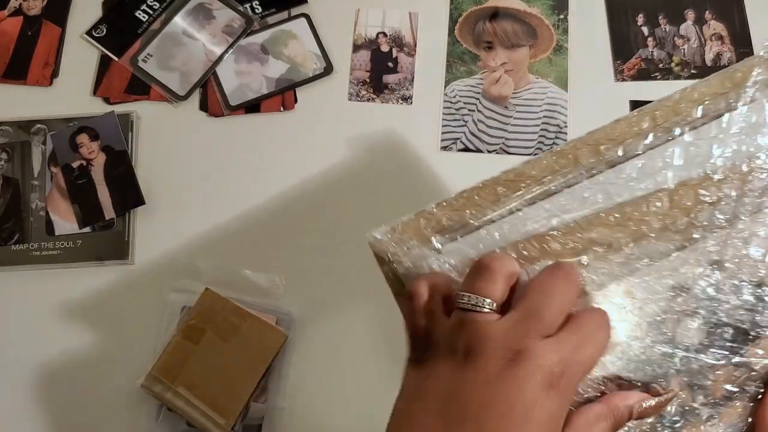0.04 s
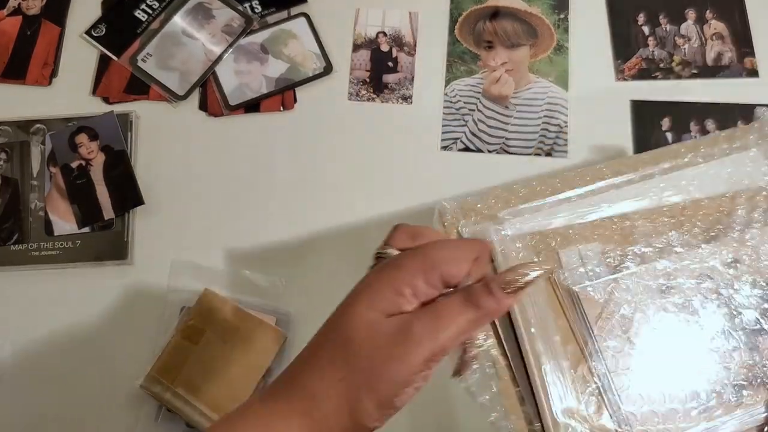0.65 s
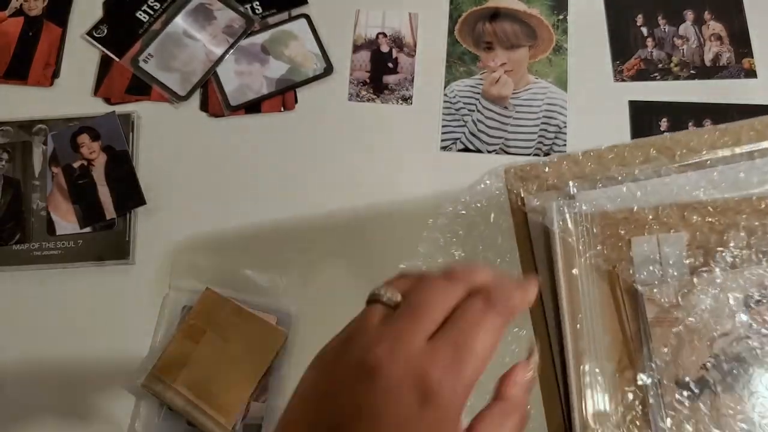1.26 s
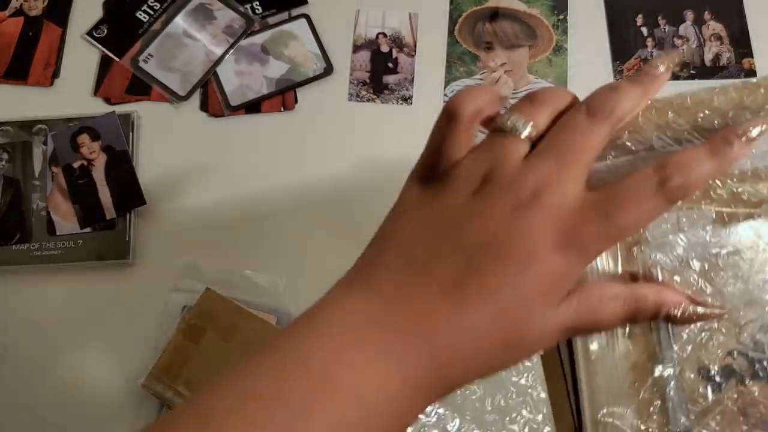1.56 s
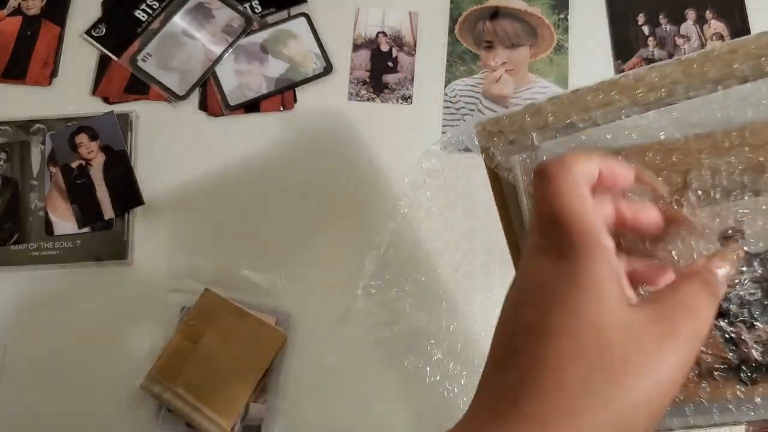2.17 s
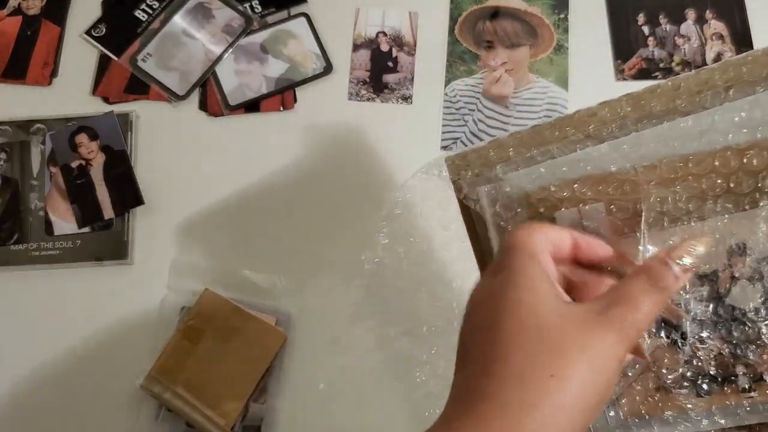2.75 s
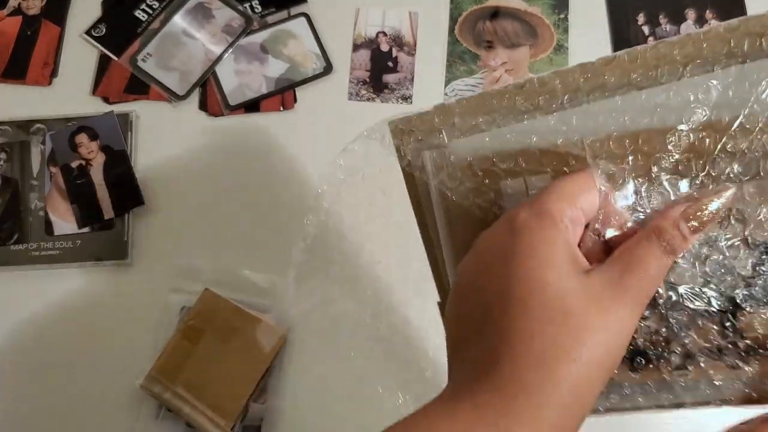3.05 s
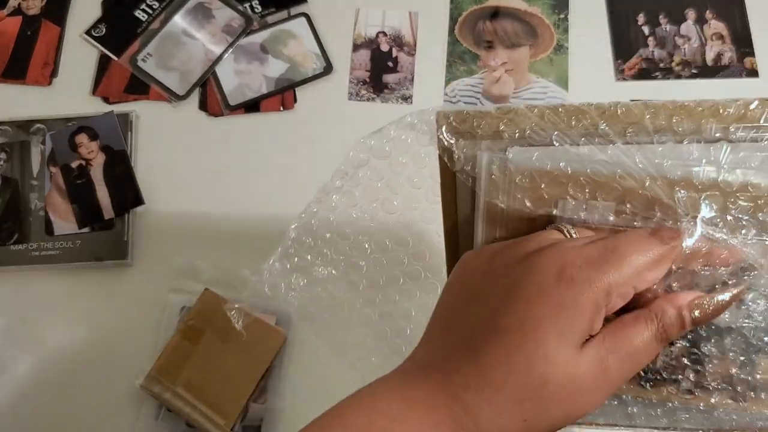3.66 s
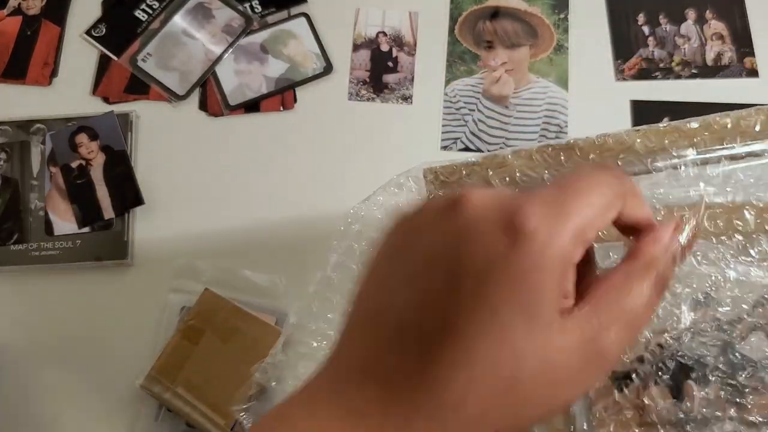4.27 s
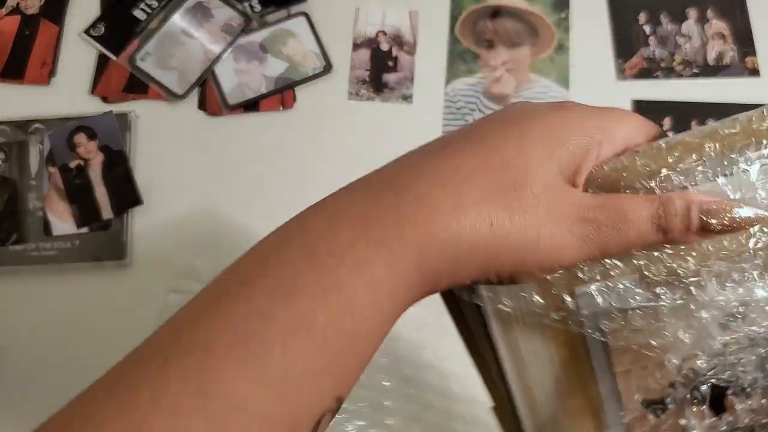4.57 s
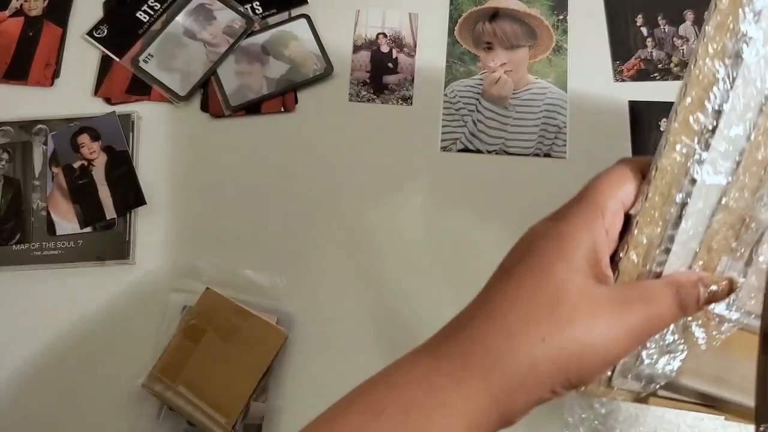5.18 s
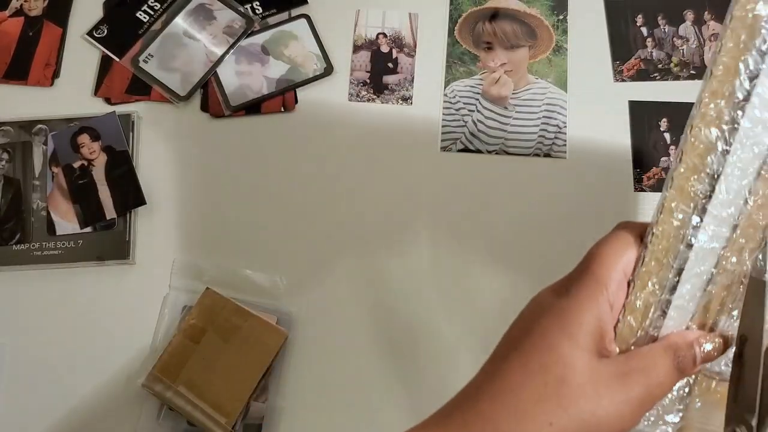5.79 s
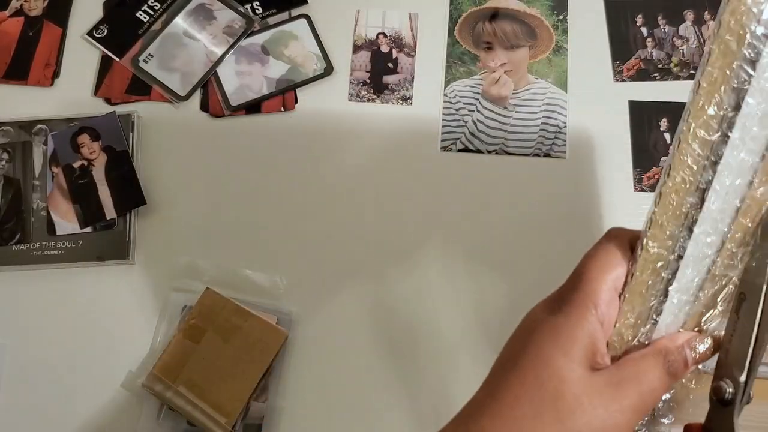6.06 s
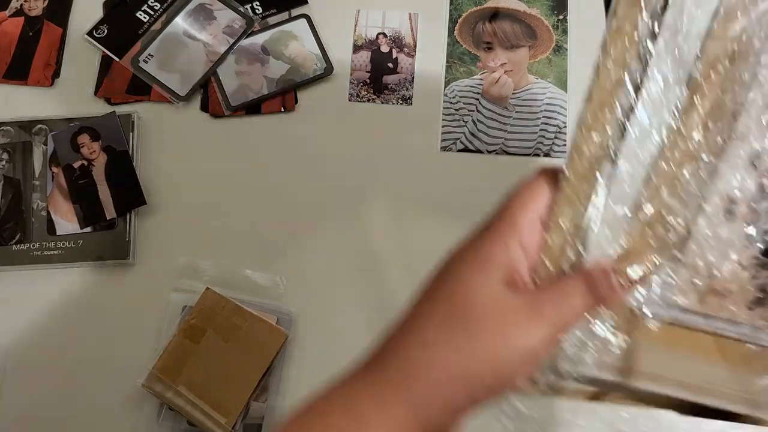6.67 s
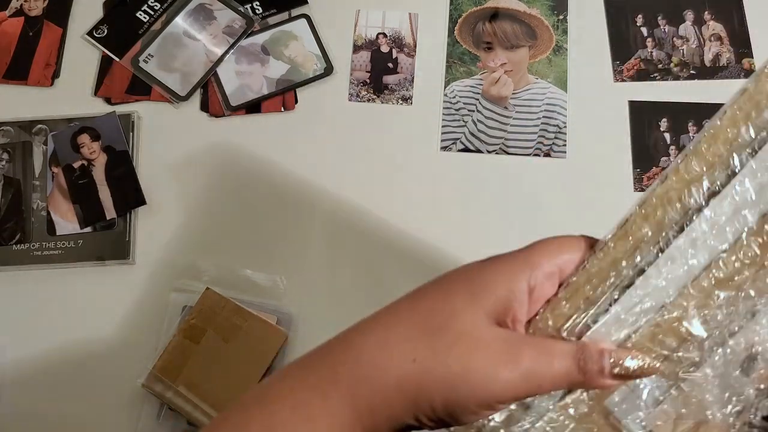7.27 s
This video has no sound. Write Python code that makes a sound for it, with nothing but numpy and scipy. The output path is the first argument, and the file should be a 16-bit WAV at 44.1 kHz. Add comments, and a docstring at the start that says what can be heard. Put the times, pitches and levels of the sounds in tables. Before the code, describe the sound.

Hands rustle plastic bubble wrap around a flat cardboard parcel in a small room, before scissors cut the film and squeak along it.

```python
"""Bubble wrap rustles and crinkles as hands turn a flat cardboard package on a table in a small room.
The crinkle is many tiny bucklings of the plastic film, while the card under it scrapes and rumbles.
Creases snap against the card and thump the package. Near the end, scissors cut a fold,
tear through the tight film in small catches, then glide along it with a squeal."""
import sys
import numpy as np
from scipy import signal
from scipy.fft import rfft, irfft, next_fast_len
from scipy.io import wavfile
from scipy.ndimage import uniform_filter1d, map_coordinates

SR = 44100
rng = np.random.default_rng(int(sys.argv[2]) if len(sys.argv) > 2 else 0)


def master(y):
    """Save y as 16-bit WAV."""
    cut = np.clip(np.atleast_2d(y).T, -1, 1)
    pcm = np.round(cut * 32767)  # scale
    wavfile.write(sys.argv[1], SR, pcm.astype(np.int16))


N = 332065
TIME = np.arange(N) / SR
TOP_HZ = 16000

# tone of a crease as it flips: (frequency [Hz], level [dB])
CRACK_TONE = [(1200, -39), (2800, -4), (4500, -1), (7000, -4), (9300, -9.5), (12000, -3), (15500, -4.5)]


def handling():
    """The film crinkles, brighter when worked harder; the card under it scrapes and rumbles."""
    # tones of the film, its high sheen, the card and the hollow package: (frequency [Hz], level [dB])
    film_tone = [(900, -30), (2000, -16), (2900, -2.5), (4300, -2.5), (5600, -3), (7600, -2.5),
                 (9300, -7.5), (12000, -5), (15500, -7.5)]
    sheen_tone = [(4000, -31), (9000, -13.5), (11500, -1.5), (15500, 0.5)]
    card_tone = [(450, -24.5), (780, -5), (1000, -4), (1280, -0.5), (1700, 0.5), (2400, 0.5), (3400, -2),
                 (5000, -25.5)]
    hollow_tone = [(60, -34), (150, -20), (230, -8), (330, -1), (450, -2.5), (650, -4.5), (850, -8),
                   (1400, -42.5)]
    film_db, card_db, hollow_db = hand_effort()
    grip_db = wobble(30) + 1.5 * wobble(130)  # fingers catch and let go
    film = amp(film_db - 0.6) * crinkle(film_tone, 1500, scatter_db=4.5, t60=.0093, bed=.6, flex_db=2.5)
    dimples = amp(film_db - 18) * bubbles(centre_hz=4500, octaves=.6, cycles=18, scatter_db=4, count=1500)
    # creases fade less than the rustle, so single ticks stand out when the hands rest
    crease_db = -59.5 + .8 * (film_db - np.median(film_db))
    ticks = amp(crease_db) * creases(per_s=60, scatter_db=3)
    sheen_db = film_db - 4.5 + .22 * (film_db + 40.5)
    sheen = amp(sheen_db) * crinkle(sheen_tone, 670, scatter_db=.5, t60=.003, bed=.5, flex_db=1.5)
    card = amp(card_db - 1) * crinkle(card_tone, 260, scatter_db=2.5, t60=.0099, bed=.51, flex_db=3)
    hollow = amp(hollow_db - 3) * crinkle(hollow_tone, 110, scatter_db=1, t60=.023, bed=.56, flex_db=5)
    return amp(grip_db) * (film + dimples + ticks + sheen + card + hollow)


def hand_effort():
    """Levels in dB of film, card and package: each stroke swells and fades over the holding hand."""
    # hand strokes on the wrap: (peak time [s], rise [s], fall [s], film [dB], card [dB], package [dB])
    strokes = [(0.022, 0.05, 0.037, -40.5, -44, -83), (0.09, 0.036, 0.039, -35, -37.5, -55.0),
               (0.38, 0.02, 0.11, -30.5, -33, -43), (0.529, 0.241, 0.032, -41, -52, -58.5),
               (0.71, 0.158, 0.119, -41.5, -52, -64.5), (0.853, 0.049, 0.135, -44, -51.5, -50.5),
               (0.938, 0.051, 0.071, -38.5, -46.5, -51.5), (1.309, 0.087, 0.049, -48.5, -54.5, -61.5),
               (1.451, 0.114, 0.051, -51, -58.5, -71), (1.548, 0.121, 0.449, -51, -63, -83),
               (1.695, 0.1, 0.08, -48.5, -55.5, -65.5), (1.813, 0.02, 0.053, -46.5, -60, -71),
               (1.937, 0.05, 0.056, -43.5, -53.5, -72), (2.0, 0.018, 0.058, -47.5, -56.5, -74),
               (2.122, 0.066, 0.26, -41.5, -55.5, -73.5), (2.239, 0.039, 0.063, -45, -48, -59),
               (2.465, 0.04, 0.035, -47, -56, -62.5), (2.534, 0.03, 0.059, -47, -51.5, -61.5),
               (2.675, 0.017, 0.035, -46, -49, -69), (2.782, 0.12, 0.25, -39.5, -48, -64),
               (2.9, 0.031, 0.14, -38.5, -45, -60.5), (3.268, 0.032, 0.032, -42.5, -39.5, -71),
               (3.446, 0.137, 0.067, -47.5, -44.0, -66.5), (3.63, 0.114, 0.11, -47.5, -49.5, -64.5),
               (3.812, 0.128, 0.062, -45, -46.0, -63), (3.899, 0.033, 0.119, -47.5, -56, -79.0),
               (4.158, 0.041, 0.073, -37, -40.5, -50.5), (4.551, 0.13, 0.112, -40.0, -45.5, -59),
               (4.845, 0.143, 0.63, -52.5, -59.5, -71.5), (5.063, 0.061, 0.086, -49, -59, -74.0),
               (5.218, 0.04, 0.044, -54, -72, -89), (5.575, 0.036, 0.099, -50, -51.5, -63.5),
               (5.782, 0.12, 0.046, -42.5, -49.0, -62.5), (6.013, 0.12, 0.074, -62.5, -51.5, -54.5),
               (6.208, 0.018, 0.057, -28.5, -33.5, -42), (6.291, 0.088, 0.053, -34.5, -34.5, -46),
               (6.453, 0.057, 0.1, -45, -53.5, -66.5), (6.895, 0.058, 0.258, -51, -66, -85),
               (7.057, 0.049, 0.07, -45, -55.5, -71.5), (7.453, 0.096, 0.043, -47.5, -50.5, -72.5)]
    # film rustle under the holding hand: (time [s], level [dB])
    holding = [(0.0, -43), (0.33, -47.5), (0.58, -56.5), (1.0, -58), (1.15, -77.5), (1.5, -75.5),
               (2.05, -59), (2.33, -48), (2.62, -59), (3.05, -44.5), (3.7, -53), (4.35, -62.67),
               (4.95, -63.5), (5.45, -70), (5.9, -55.5), (6.6, -57.5), (6.8, -65), (7.52, -58.5)]
    offsets_db = np.array([[0], [-12.5], [-29.5]])  # card and package are quieter than the film
    power = amp(curves(holding)[0] + offsets_db) ** 2
    for s, rise, fall, *levels_db in strokes:
        away = np.maximum((s - TIME) / rise, (TIME - s) / fall)
        near = away < 2
        drop_db = 21 * away[near] ** 1.584  # a swell with a rounded top
        power[:, near] += amp(np.array(levels_db)[:, None] - drop_db) ** 2
    return 10 * np.log10(power)


def crinkle(tone, per_s, scatter_db, t60, bed, flex_db):
    """A sheet buckles in tiny random clicks, most weak and a few strong."""
    strength = np.minimum(rng.exponential(size=N), 4)
    clicks = (rng.random(N) < per_s / SR) * amp(scatter_db * strength)
    rustle = spread(grains(clicks, t60, bed))
    return unit(colour(flexing(rustle, flex_db), tone))


def flexing(x, depth_db):
    """A sheet's resonances drift as it bends: patches of the sound grow louder and softer."""
    spectra = signal.stft(x, nperseg=512)[2]
    patches = rng.standard_normal(spectra.shape[1:])
    for _ in range(2):
        patches = uniform_filter1d(uniform_filter1d(patches, size=3, axis=0), size=7, axis=1)
    return signal.istft(spectra * amp(depth_db * unit(patches)), nperseg=512)[1][:, :N]


def bubbles(centre_hz, octaves, cycles, scatter_db, count):
    """Single air bubbles dimple and ring briefly, each at its own pitch and place."""
    when, place, lag = rng.random((count, 3)).T[:, :, None]
    pitch, size = np.clip(rng.standard_normal((count, 2)), -2, 2).T[:, :, None]
    hz = np.minimum(centre_hz * 2 ** (octaves * pitch), TOP_HZ)
    t = np.arange(SR // 100) / SR
    ring = amp(scatter_db * size - 60 * t * hz / cycles) * np.sin(2 * np.pi * hz * t) / np.sqrt(hz)
    ring = np.diff(ring, prepend=0)  # a tiny bubble gives off no bass
    start = (when * N).astype(int) + np.arange(len(t))
    delay = (24 * lag).astype(int)  # in samples
    ears = [(start + delay, .5 + place), (start + delay.max() - delay, 1.5 - place)]
    return unit(np.array([np.bincount(i.ravel(), (gain * ring).ravel(), N)[:N] for i, gain in ears]))


def creases(per_s, scatter_db):
    """Small creases flip at random, each a dry tick."""
    flips = rng.random(N) < per_s / SR
    sizes = amp(scatter_db * np.clip(rng.standard_normal(N), -2, 2))
    return unit(colour(spread(grains(flips * sizes, t60=.003, bed=0)), CRACK_TONE))


def snaps():
    """A crease flips with a crack, knocks the card and thumps the package."""
    # loud crease snaps and fingernail taps: (time [s], crack [dB], knock [dB], thud [dB])
    hits = [(0.0183, -45.5, -49, -80), (0.0813, -34, -29.5, -50.5), (0.353, -42.5, -57, -80),
            (0.366, -32.5, -34, -64), (0.3763, -33, -27, -42.5), (0.382, -43, -38.5, -49),
            (0.4102, -38.5, -40.5, -52), (0.414, -40.5, -41, -51.5), (0.898, -47.5, -70, -70),
            (1.24, -50, -52.5, -68), (1.4329, -48.5, -71, -80), (1.5445, -48, -72, -88),
            (1.621, -47.5, -63, -73), (1.6938, -53, -54, -62.5), (1.936, -38, -53.5, -50),
            (1.9408, -46, -49.5, -65), (2.155, -46, -55, -75), (2.2405, -42.5, -50, -64.5),
            (2.5416, -43.5, -44.5, -63.5), (2.896, -43.5, -69, -74), (2.906, -43, -62, -71),
            (2.932, -41, -55.5, -74), (2.956, -41, -49.5, -62.5), (3.3919, -51, -50.5, -86),
            (3.444, -58, -50.5, -75), (3.6175, -53, -48, -60.5), (3.751, -45.5, -61, -75),
            (4.1451, -54.5, -55, -58.5), (4.616, -41.5, -48.5, -60.5), (4.8456, -47.5, -54.5, -66.5),
            (5.412, -64.5, -93, -100), (5.573, -54.5, -65.5, -82), (5.7814, -49, -73, -64.5),
            (5.9957, -44.5, -53.5, -69), (6.0066, -44, -53.5, -65), (6.2018, -32, -47, -74),
            (6.2152, -31.5, -45.5, -78), (6.748, -61, -83, -100), (7.0514, -49, -76.5, -83),
            (7.076, -43.5, -70, -83.5), (7.4491, -45.5, -54, -73)]
    # resonances of the bending card: (frequency [Hz], width [Hz], level [dB])
    card_modes = [(858, 150, -6), (1270, 172, 3), (1663, 350, -3.5), (2063, 160, -2), (2543, 450, -3.5),
                  (3330, 590, -8.5)]
    # tone of the thumped package: (frequency [Hz], level [dB])
    thud_tone = [(40, -13), (110, -8), (165, -3.5), (240, -6), (340, -3), (420, -0.5), (650, 0.5),
                 (900, -8), (1400, -27.5)]
    out = np.zeros((2, N + SR))
    for s, crack_db, knock_db, thud_db in hits:
        crack = amp(crack_db) * unit(colour(burst(t60=.0035, tail_db=-7.5, tail_t60=.057), CRACK_TONE))
        # each grip retunes the card and favours other resonances
        modes = [(hz * (1 + .025 * rng.standard_normal()), width, db + 2.9 * rng.standard_normal())
                 for hz, width, db in card_modes]
        blow = burst(t60=.004, tail_db=-11.5, tail_t60=.047)
        blow[:, 0] += 4.5  # the first push is the same left and right
        knock = amp(knock_db) * unit(resonate(blow, modes))
        thud = amp(thud_db) * unit(colour(blow, thud_tone))
        out[:, round(s * SR):][:, :crack.shape[1]] += crack + knock + thud
    return out[:, :N]


def burst(t60, tail_db, tail_t60):
    """A sharp release, then a shiver of the wrap; t60 is the seconds taken to fade by 60 dB."""
    t = np.arange(SR // 20) / SR
    shape = amp(-60 * t / t60) + amp(tail_db - 60 * t / tail_t60)
    return spread(shape * rng.standard_normal((2, len(t))))


def scissors():
    """Blades cut a fold, tear on in catches, then glide so fast that the catches merge into a squeal."""
    # the blades close on a fold: (time [s], level [dB])
    cutting = [(5.76, -65), (5.768, -30.5), (5.781, -26.5), (5.786, -41), (5.805, -63.5)]
    # tone of that cut: (frequency [Hz], level [dB])
    cut_tone = [(2000, -23), (4000, -14.5), (9000, -15.5), (10500, 0), (15500, -1)]
    # a blade tears the film, then glides along it: (time [s], level [dB], catches [per s])
    tearing = [(5.997, -43.5, 160), (6.01, -42, 290), (6.035, -40, 300), (6.055, -38.5, 240),
               (6.08, -41, 240), (6.105, -50.5, 260), (6.12, -67, 290)]
    gliding = [(6.88, -54.5, 1300), (6.893, -43, 1350), (6.915, -41.5, 1400), (6.952, -67.5, 1600),
               (6.964, -34.5, 1750), (6.976, -26.5, 1900), (6.989, -23.5, 2030), (7.0, -32.5, 1900),
               (7.018, -33.5, 3600), (7.045, -65, 2200)]
    # resonances of the torn edge and the tight film: (frequency [Hz], width [Hz], level [dB])
    edge_modes = [(3000, 420, -1.5), (4440, 1000, -2), (7550, 1100, 4), (11400, 1300, 0.5),
                  (14600, 1600, 3.5)]
    film_modes = [(1937, 280, -5), (3020, 300, -1), (4020, 260, 0.5), (5220, 870, 2), (6580, 400, -1.5),
                  (7710, 630, 1), (10470, 480, -0.5), (12200, 1400, 1.5), (14200, 610, 3),
                  (15500, 900, -2.5)]
    cut = amp(-0.5) * gesture(cutting) * unit(colour(stereo_noise(N), cut_tone))
    catches = slips(curves(tearing)[1], jitter=.19, scatter_db=-3)
    rip = spread(grains(catches, t60=.0033, bed=.09))
    tear = gesture(tearing) * unit(resonate(rip, edge_modes))
    buzz = unit(slips(curves(gliding)[1], jitter=.06, scatter_db=1))
    squeal = gesture(gliding) * unit(resonate(.6 * buzz + .8 * stereo_noise(N), film_modes))
    # thin film gives off no bass
    return cut + filtered(tear + squeal, lambda hz: 1 - 1 / (1 + (hz / 1600) ** 8))


def slips(per_s, jitter, scatter_db):
    """The film sticks and slips on the blade, making clicks at an uneven rate."""
    cycles = np.floor(np.cumsum(per_s * (1 + jitter * wobble(300))) / SR)
    return np.diff(cycles, prepend=0) * amp(scatter_db * rng.standard_normal(N))


def accents():
    """Short swells of noise around one pitch: accents on the snaps, low bumps and brief creaks."""
    # noise swells: (peak time [s], half length [s], frequency [Hz], level [dB])
    swells = [(.38, .004, 960, -32.5), (0.383, .0065, 125, -54), (0.605, .08, 610, -67.5),
              (0.923, 0.0092, 388, -48), (1.239, 0.003, 1070, -44.5), (1.543, 0.0025, 5200, -40.5),
              (4.159, 0.015, 250, -57.5), (4.174, 0.0092, 91.5, -58), (4.615, .002, 3450, -36),
              (4.864, 0.0068, 332, -58.5), (5.95, .014, 1280, -49), (6.293, .023, 675, -45),
              (6.322, 0.017, 363, -54.5), (7.425, 0.017, 1110, -56)]
    out = np.zeros((2, N + SR))
    t = np.arange(SR // 2) / SR
    middle = t[-1] / 2
    for s, half, hz, db in swells:
        swell = np.exp(-.5 * ((t - middle) / half) ** 2)
        noise = stereo_noise(len(t)) * swell
        width_hz = .27 * hz
        band = resonate(resonate(noise, [(hz, width_hz, 0)]), [(hz, 2 * width_hz, 0)])
        gain = amp(db) * np.sqrt(np.mean(swell ** 2))
        out[:, round((s - middle) * SR):][:, :len(t)] += gain * unit(band)
    return out[:, :N]


def trapped_air(x):
    """Air inside the package rings on."""
    # its resonances: (frequency [Hz], width [Hz], level [dB])
    air_modes = [(332.2, 10, -1), (650, 9.3, -6.5)]
    return resonate(x, air_modes)


def room(x):
    """Sound bounces off the table and walls and quickly dies away."""
    # how long the echo lasts: (frequency [Hz], time to fade by 60 dB [s])
    fade_times = [(150, 0.13), (1500, 0.21), (6000, 0.4), (15000, 0.27)]
    hz, t, spectra = signal.stft(rng.standard_normal((2, SR // 2)), SR, nperseg=256)
    fade = amp(-60 * t / along(fade_times, hz)[:, None])
    echo = signal.istft(spectra * fade, SR, nperseg=256)[1]
    echo = spread(echo / np.linalg.norm(echo[0]))
    echo = np.pad(echo, ((0, 0), (SR // 250, 0)))  # arrives 4 ms late
    return signal.fftconvolve(x, echo, axes=1)[:, :N]


def background():
    """Quiet room air with a low hum."""
    # tone of the air: (frequency [Hz], level [dB])
    air_tone = [(15, -38), (25, -11), (70, 7.5), (108, -6), (149, -7.5), (175, -38), (212, -8.5),
                (249, -21), (335, -15.5), (430, -26), (607, -25), (754, -30), (1020, -25.5), (2990, -29),
                (16000, -40)]
    air = unit(colour(stereo_noise(N), air_tone))
    return amp(-78.5) * air + amp(-94.5) * np.sin(2 * np.pi * 70 * TIME)


def grains(clicks, t60, bed):
    """Each click becomes a tiny fading noise burst; bed is the share of smooth sliding noise."""
    t = np.arange(SR // 20) / SR
    power = np.abs(signal.fftconvolve(clicks ** 2, amp(-60 * t / t60) ** 2)[:N])
    return np.sqrt(bed + (1 - bed) * power / power.mean()) * rng.standard_normal((2, N))


def spread(pair):
    """Mix two signals to left and right: alike in the bass, unrelated in the treble."""
    # how alike the two sides are: (frequency [Hz], likeness [-1 to 1])
    likeness = [(100, 0.76), (350, 0.68), (700, 0.52), (1400, 0.2), (2600, -0.054), (6000, -0.13),
                (15000, 0)]
    turn = lambda hz: np.arccos(along(likeness, hz)) / 2
    mid, side = filtered(pair, lambda hz: np.array([np.cos(turn(hz)), np.sin(turn(hz))]))
    return np.array([mid + side, mid - side])


def stereo_noise(n):
    """n samples of hiss, left and right."""
    return spread(rng.standard_normal((2, n)))


def resonate(x, modes):
    """Ring x through resonances: (frequency [Hz], width [Hz], level [dB])."""
    return filtered(x, lambda hz: sum(amp(db) * 1j * hz * w / (c * c - hz * hz + 1j * hz * w) * (-1) ** k
                                      for k, (c, w, db) in enumerate(modes)))


def colour(x, tone):
    """Give x a tone, falling away beyond the table's ends."""
    def response(hz):
        skirts = 1 / (1 + (tone[0][0] / (hz + 1)) ** 2) / (1 + (hz / (2 * tone[-1][0])) ** 4)
        cepstrum = irfft(np.log(amp(along(tone, hz)) * skirts + 1e-6))
        half = len(cepstrum) // 2
        cepstrum[1:half] *= 2
        cepstrum[half + 1:] = 0  # so it rings after a click, never before
        return np.exp(rfft(cepstrum))
    return filtered(x, response)


def filtered(x, response):
    """Multiply each frequency in x by response(hz)."""
    n = x.shape[-1]
    m = 2 * next_fast_len(n)
    return irfft(rfft(x, m) * response(np.fft.rfftfreq(m, 1 / SR)), m)[..., :n]


def gesture(rows):
    """Gain of a short movement, silent outside it."""
    return amp(curves(rows)[0]) * (TIME > rows[0][0]) * (TIME < rows[-1][0])


def curves(rows):
    """One value per sample for each column after the time."""
    times, *columns = np.transpose(rows)
    return [np.interp(TIME, times, column) for column in columns]


def along(points, hz):
    """Read (frequency, value) points on a log axis."""
    frequencies, values = np.transpose(points)
    return np.interp(np.log(hz + 1), np.log(frequencies), values)


def wobble(per_s):
    """A smooth curve through per_s random points a second."""
    return map_coordinates(rng.standard_normal(int(N * per_s / SR) + 4), [TIME * per_s])


def amp(db):
    """Decibels to gain."""
    return 10 ** (np.asarray(db) / 20)


def unit(x):
    """Scale to an average power of 1."""
    return x / np.sqrt(np.mean(x ** 2) + 1e-20)


def scene():
    """The package lies a little to the right, and the scissors further right."""
    package = (handling() + snaps() + accents()) * amp([[-.7], [.5]])
    direct = package + scissors() * amp([[-1.8], [1.2]])
    return direct + trapped_air(direct) + amp(-13) * room(direct) + background()


def record(dry):
    """Remove the very highest treble."""
    return filtered(dry, lambda hz: hz < TOP_HZ)


dry = scene()
out = record(dry)
master(out)
```